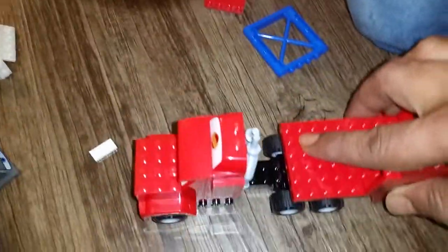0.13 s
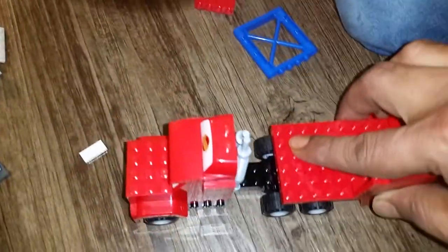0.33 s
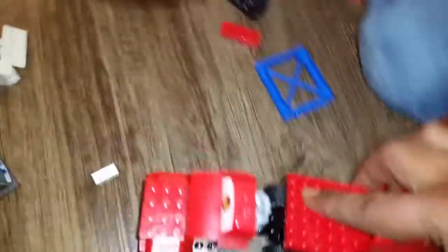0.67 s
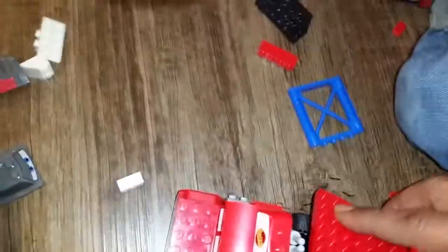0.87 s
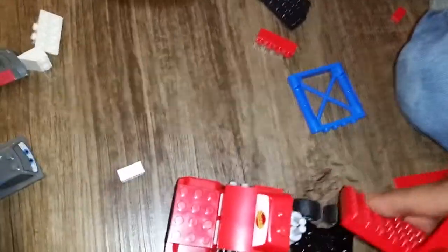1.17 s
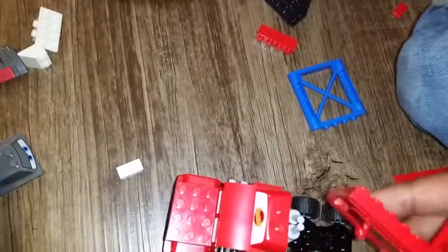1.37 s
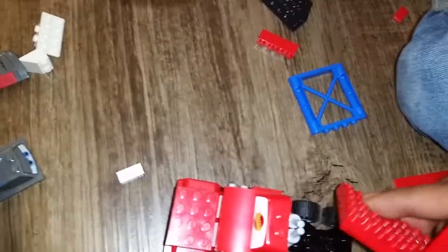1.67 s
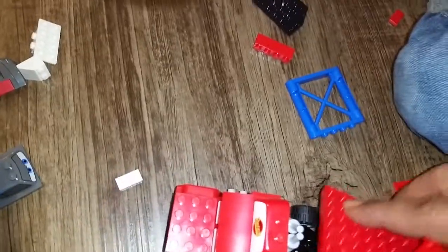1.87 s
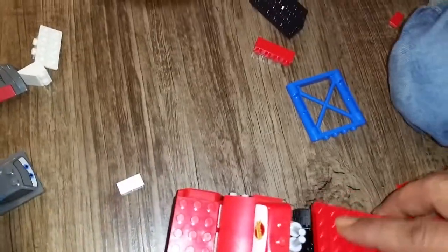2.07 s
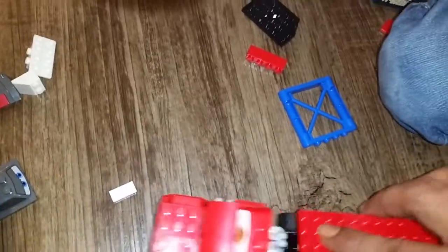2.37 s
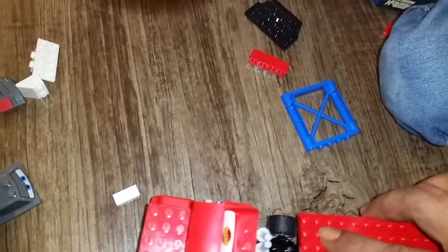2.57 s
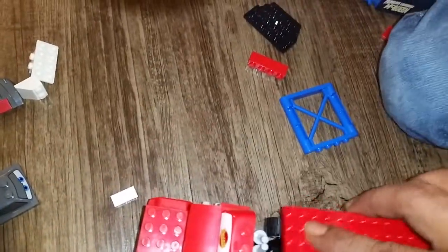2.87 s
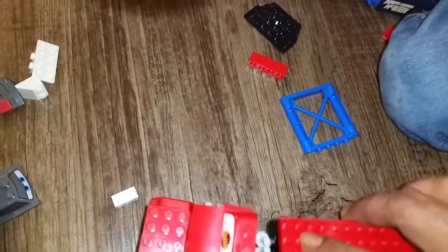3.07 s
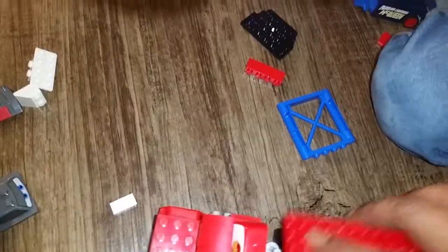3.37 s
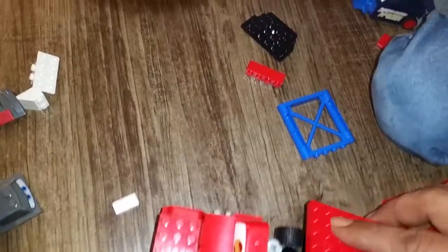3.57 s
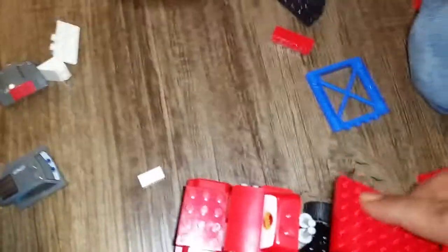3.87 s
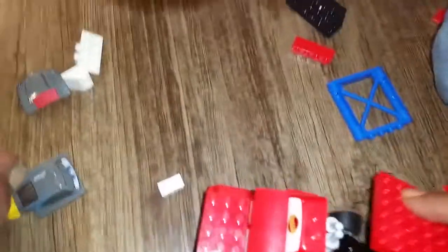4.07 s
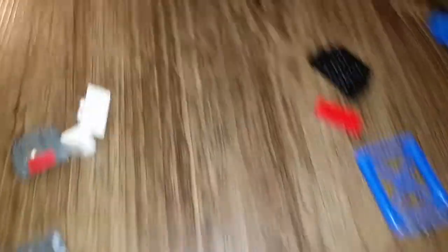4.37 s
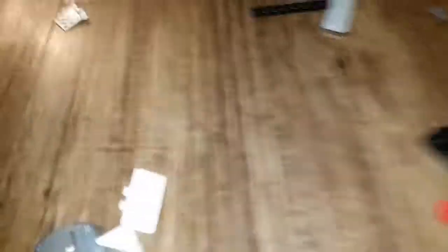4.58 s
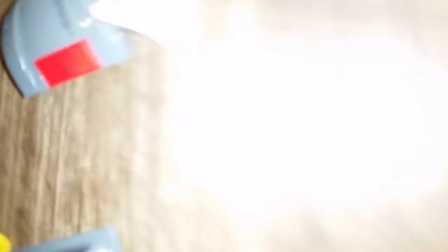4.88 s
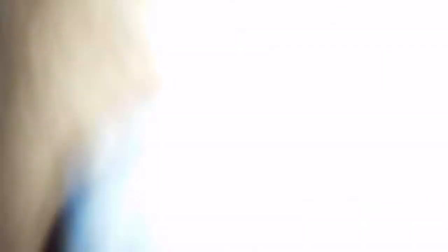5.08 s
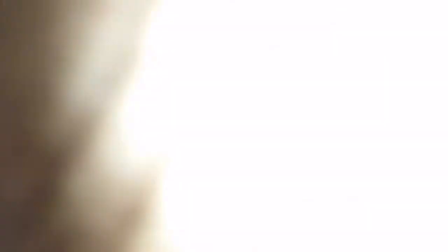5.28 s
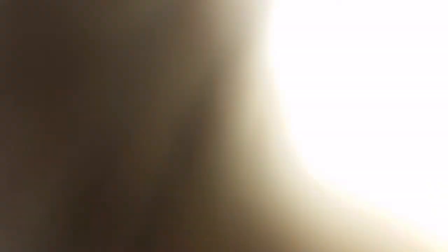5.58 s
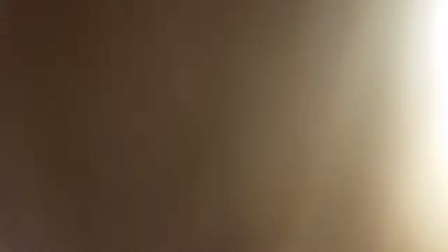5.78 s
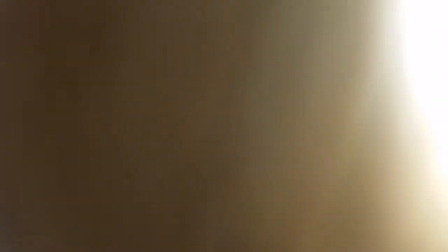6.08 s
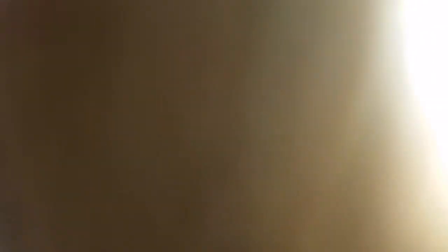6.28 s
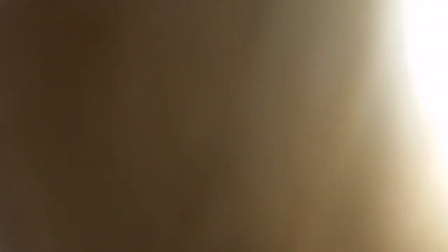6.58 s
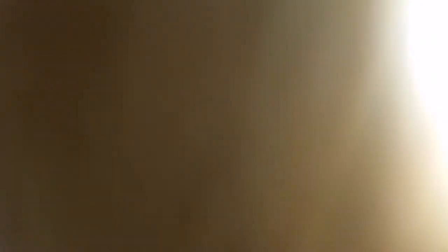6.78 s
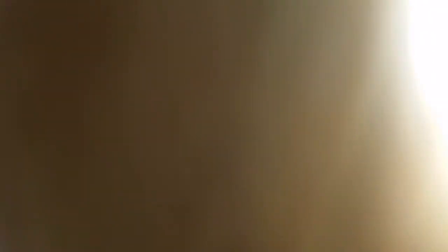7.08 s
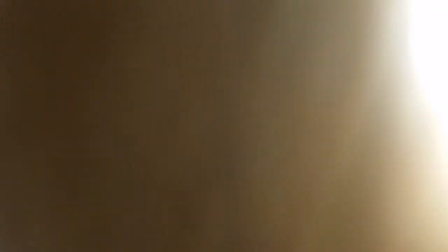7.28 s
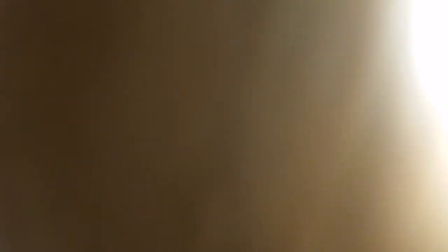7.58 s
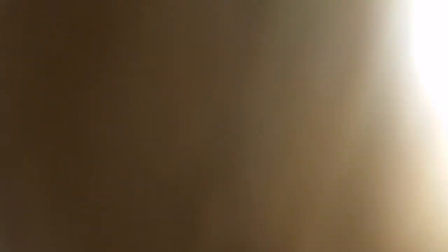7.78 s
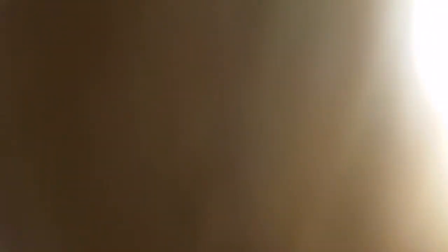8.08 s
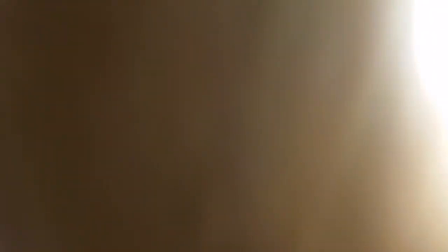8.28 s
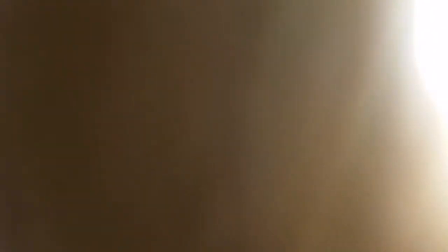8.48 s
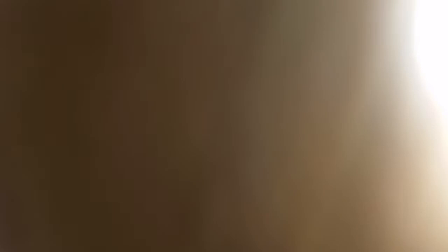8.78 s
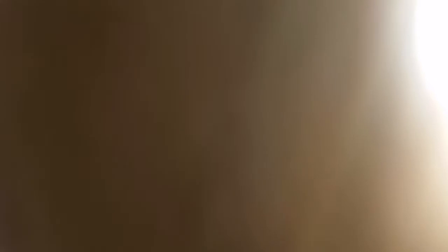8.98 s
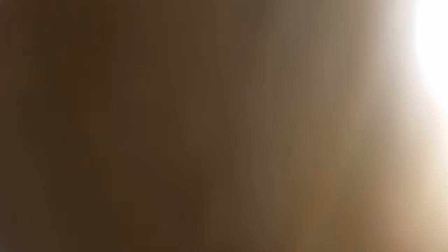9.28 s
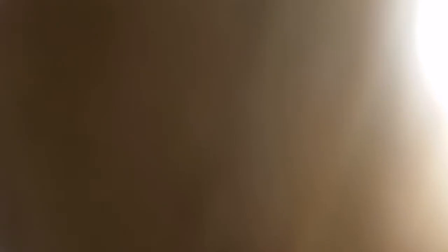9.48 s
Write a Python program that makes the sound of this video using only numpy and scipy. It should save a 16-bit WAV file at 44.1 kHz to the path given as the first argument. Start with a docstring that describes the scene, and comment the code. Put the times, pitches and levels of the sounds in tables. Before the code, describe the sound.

Hands handle a plastic toy truck close by on a wooden floor in a small room, over faint rustling, low hum and hiss. Scattered dull clacks and short scrapes fill the first four seconds, with a quick cluster of sharp, ringing snaps from 2.6 to 3 seconds as bricks lock in. Two bright clicks come around 5 seconds. At 5.2 the microphone is set down with a very loud, slightly overloaded thump and quick bounces; more low bumps, case knocks and rumble follow, mostly left, until 5.9. The background sinks until about 7 seconds, leaving a faint drag near 6.1 and light ticks on the right from 6.5 to 6.8. From 7 to 7.7 loose bricks rattle brightly, close on the right, with soft scraping. A clack follows, then a click at 8.6 and a dull knock at 8.8 amid soft rustling.

```python
"""Dull clacks, scrapes and a few ringing snaps: plastic bricks are pressed onto a toy truck on a
wooden floor, each blow ringing the modes of a part. The phone is put down with loud thumps and
bounces, the background sinks for a while, then loose bricks rattle close on the right.
Hands rustle throughout, over a low hum and the hiss of a small room."""
import sys
import numpy as np
from scipy import signal
from scipy.fft import rfft, irfft
from scipy.io import wavfile

SR = 44100
rng = np.random.default_rng(int(sys.argv[2]) if len(sys.argv) > 2 else 0)


def output_pcm(signal):
    """Save a mono or channel-first signal as 16-bit PCM at the path in sys.argv[1].

    Samples are clipped to [-1, 1] before scaling.
    """
    pcm = np.clip(np.atleast_2d(signal).T, -1, 1) * 32767
    wavfile.write(sys.argv[1], SR, np.round(pcm).astype(np.int16))


N = 425124
TIME = np.arange(N) / SR
TOP_HZ = 14800
# the phone lands on its right end, tips onto its left microphone and is let go
LANDING_S, TIP_S, LET_GO_S = 5.2075, 5.436, 5.94
# pan is left minus right; the phone ends up turned, which moves the bricks to the right
LANDED_PAN_DB, TIPPED_PAN_DB, TURN_DB = -2.5, 14.5, -8


def undb(db):
    """Decibels to gain."""
    return 10 ** (np.asarray(db) / 20)


def unit(x):
    """Scale to rms 1."""
    return x / np.sqrt(np.mean(x ** 2))


def ears(pan_db):
    """Left and right gains whose mean is 1."""
    gains = undb(np.array([[pan_db], [-pan_db]]) / 2)
    return gains / gains.mean()


def add(track, s, sound):
    """Mix a sound in at a time."""
    start = max(int(s * SR), 0)
    track[:, start:start + sound.shape[1]] += sound[:, :N - start]


def noise(size, likeness):
    """Stereo white noise; likeness is the correlation of the sides."""
    mid, side = rng.standard_normal((2, size))
    spread = np.sqrt(1 - likeness) * side * np.array([[1], [-1]])
    return (np.sqrt(1 + likeness) * mid + spread) / np.sqrt(2)


def walk(rate, size):
    """A random wobble with a spread near 1 and rate turns a second."""
    knots = np.arange(size) * rate / SR
    count = int(knots[-1]) + 2
    return np.interp(knots, np.arange(count), rng.standard_normal(count))


def fading(t, t60):
    """A decay of 60 dB in t60 seconds."""
    return np.exp(-np.log(1000) * t / t60)


def colour(x, points):
    """Equalise along a curve of (f/Hz, level/dB) points."""
    hz, db = np.transpose(points)
    bins = np.arange(x.shape[-1] // 2 + 1) * SR / x.shape[-1]
    return irfft(rfft(x) * undb(np.interp(np.log(bins + 1), np.log(hz), db)), x.shape[-1])


def resonate(x, hz, width_hz):
    """One resonance, gain 1 at its centre."""
    hz = min(hz, SR / 2 - 1000)
    return signal.lfilter(*signal.iirpeak(hz, hz / min(width_hz, SR / 4), fs=SR), x)


def lowpass(x, hz, order):
    """Roll off the top."""
    return signal.sosfilt(signal.butter(order, min(hz, SR / 2 - 1000), fs=SR, output="sos"), x)


def room(x, wet_db, t60=0.52, early_t60=0.1, early_db=3, cross=0.69):
    """Quick reflections from floor and furniture, then the tail of a small room."""
    t = np.arange(SR // 2) / SR
    decay = fading(t, t60) + undb(early_db) * fading(t, early_t60)
    response = noise(len(t), 0.064) * decay * (1 - np.exp(-t / 0.0025))
    response /= np.sqrt(np.sum(response ** 2, axis=1, keepdims=True))
    return x + undb(wet_db) * signal.fftconvolve(x + cross * x[::-1], response, axes=1)[:, :N]


def from_right(x, lag_s=0.0004):
    """Sound from the right reaches the left microphone a little later."""
    return np.array([np.roll(x[0], int(lag_s * SR)), x[1]])


def placed(rows, pan_db):
    """Pan blows to where their part lies, further right once the phone has turned."""
    return [(s, db, hz, pan_db + TURN_DB * (s > LANDING_S)) for s, db, hz in rows]


def on_case(rows):
    """Pan knocks to the side of the phone that touches down."""
    return [(s, db, hz, TIPPED_PAN_DB if TIP_S < s < LET_GO_S else LANDED_PAN_DB) for s, db, hz in rows]


def strikes(rows, modes, focus_db, crack_db, contact_s, touch, top_hz, detune, bounce, likeness,
            gain_db):
    """Each blow is a hard touch, a short chatter and a rebound that ring the modes of a plastic part."""
    out, t = np.zeros((2, N)), np.arange(SR // 8) / SR
    # a small part radiates little below its lowest mode
    low_cut = signal.butter(3, 0.56 * modes[0][0], "highpass", fs=SR, output="sos")
    for s, db, strong_hz, pan_db in rows:
        force = noise(len(t), likeness) * np.exp(-(t / contact_s) ** 2)
        force[:, 0] += touch
        force += bounce * np.roll(force, int(rng.uniform(.002, 0.0068) * SR), axis=1)
        # a softer contact carries less treble
        force = signal.sosfilt(low_cut, lowpass(force, max(top_hz, 0.9 * strong_hz), order=3))
        sound = undb(crack_db) * resonate(force, strong_hz, 2.3 * strong_hz)
        for hz, width_hz, mode_db in modes:
            # the spot struck favours modes near strong_hz; the others shift with piece and grip
            nearness = np.exp(-(np.log2(hz / strong_hz) / 0.25) ** 2)
            shift = 1 + detune * (1 - nearness) * rng.standard_normal()
            sound += undb(mode_db + focus_db * nearness) * resonate(force, hz * shift, width_hz)
        crest = 3 * sound[:, :SR // 100].std(axis=1, keepdims=True)
        add(out, s, sound / crest * undb(db + gain_db) * ears(pan_db))
    return out


def sinking(low_db=-14.5, sink_s=0.14, return_s=7.035, rise_s=0.078, after_db=2):
    """Background gain in dB: it ducks at the landing, holds and comes back a little louder."""
    sunk = 1 - np.exp(-np.maximum(TIME - LANDING_S, 0) / sink_s)
    back = (1 + np.tanh((TIME - return_s) / rise_s / 2)) / 2
    return low_db * sunk * (1 - back) + after_db * back


def muffle(x, top_hz=9000, held_db=3.5, lying_db=-2):
    """Mids and top hiss duck further than the rest; the top stays duller once the phone lies."""
    scoop = 1 - undb(0.33 * np.minimum(sinking(), 0))
    x = x - resonate(x, hz=1250, width_hz=1300) * scoop
    dull = signal.sosfiltfilt(signal.butter(8, top_hz, fs=SR, output="sos"), x)
    return dull + (x - dull) * undb(sinking() + np.where(TIME < LANDING_S, held_db, lying_db))


def room_tone(air_db=-45, hum_gain_db=-1, waver_db=2.5, split_hz=900, hiss_db=-3):
    """A wavering hum over low room noise, alike on both sides, and a wide hiss."""
    # tones of the hum: f/Hz, level/dB
    tones = [(120.5,-55), (165,-50), (651,-62)]
    # EQ of the room noise: f/Hz, level/dB
    air_eq = [(15, -42.5), (25, -15.5), (71, -8), (106, -1.5), (167, -11), (191, -0.5), (415, -11.5),
              (637, -11), (729, -13.5), (1060, -15), (1720, -18.5), (3540, -13), (8100, -29.5),
              (13800, -22.5), (15000, -37)]
    wide = noise(N, 0.023)
    hiss = wide - lowpass(wide, split_hz, order=1)
    air = lowpass(noise(N, 0.78), split_hz, order=1) + undb(hiss_db) * hiss
    hum = 0
    for hz, db in tones:
        amplitude = np.sqrt(2) * undb(db + hum_gain_db + waver_db * walk(6, N))
        hum += amplitude * np.sin(2 * np.pi * hz * TIME + .5 * walk(9, N))
    return (unit(colour(air, air_eq)) * undb(air_db) + hum) * undb(sinking()) * ears(-0.91)


def rustle(resting_db=-44.5, gain_db=-3.5, flicker_db=1.5, pan_db=-7.5):
    """Skin and sleeves brush along with a fine flicker; each stroke swells and fades."""
    # hand strokes: middle t/s, length/s, level/dB
    strokes = [(0.27,1.04,-43.5), (1.31,0.48,-40.5), (1.675,0.5,-37), (2.398,2.8,-42.5), (3.563,1.25,-41.5),
               (4.165,0.5,-39), (5.077,0.3,-36.5), (7.608,1.95,-41.5), (8.25,0.16,-40), (8.725,0.52,-38.5),
               (9.38,0.2,-40)]
    # EQ of skin and cloth: f/Hz, level/dB
    cloth_eq = [(710, -37), (1200, -11), (1670, -10), (2510, -2), (4090, -3.5), (7310, -2), (8300, -3),
                (10100, -16.5), (13900, -16.5), (15000, -37.5)]
    power = undb(resting_db) ** 2
    for s, length, db in strokes:
        swell = np.cos(np.pi * np.clip((TIME - s) / length, -.5, .5))
        power = power + (undb(db) * swell) ** 2
    level_db = 10 * np.log10(power) + sinking() + flicker_db * walk(60, N)
    return unit(colour(noise(N, 0.13), cloth_eq)) * undb(level_db + gain_db) * ears(pan_db)


def grip_rumble(db=-34, rise_db_per_s=21, fall_db_per_s=170, jolt_db=3, pan_db=12):
    """The grip slides on the phone and tightens; its rumble dies as the hand lets go."""
    rub = resonate(noise(N, .4), hz=110, width_hz=260)
    rumble = unit(lowpass(resonate(rub, hz=110, width_hz=260), 190, order=2))
    grip_db = db - np.maximum(rise_db_per_s * (LET_GO_S - TIME), fall_db_per_s * (TIME - LET_GO_S))
    return rumble * undb(grip_db + jolt_db * walk(23, N)) * ears(pan_db)


def case_taps():
    """The phone's case knocks dully as it settles."""
    # knocks: t/s, level/dB, strongest f/Hz
    hits = [(5.2073,-4,1110), (5.2112,-5.5,800), (5.3615,-14,3100), (5.6595,-27,950), (5.4445,-11.5,704),
            (5.6695,-7,812), (5.6725,-12.5,1150), (5.6915,-20,1500), (5.7045,-17.5,900),
            (5.7152,-14.5,3100), (5.7228,-17.5,1800), (5.7335,-12,1750), (5.741,-14,1650), (5.745,-14,800),
            (5.8105,-19.5,1000), (5.845,-23.5,800), (5.882,-16,1700), (5.8875,-17,910)]
    # case modes: f/Hz, width/Hz, level/dB
    modes = [(560,150,10.5), (810,300,7), (1250,350,4.5), (1750,400,-4.5), (2330,300,-5.5), (3150,400,-6)]
    return strikes(on_case(hits), modes, focus_db=15.5, crack_db=-19.5, contact_s=0.0018, touch=3.6,
                   top_hz=3120, detune=0.088, bounce=0.14, likeness=0.15, gain_db=-4)


def corner_pings():
    """A hard corner strikes plastic and pings."""
    # pings: t/s, level/dB, strongest f/Hz
    hits = [(5.2073,-10.5,6660), (5.3355,-23.5,7600), (5.67,-19.5,5870), (5.7232,-27.5,7540),
            (5.7635,-13.5,2580), (5.785,-24,6200), (5.789,-27,3800), (5.845,-22,4400)]
    # modes the corner rings: f/Hz, width/Hz, level/dB
    modes = [(2550,30,4.5), (3774,36,0.5), (4400,120,-9), (5890,73,2), (6500,130,-6), (7520,90,1),
             (9800,97,-10)]
    return strikes(on_case(hits), modes, focus_db=9.5, crack_db=-13, contact_s=0.0016, touch=6.1,
                   top_hz=11300, detune=0, bounce=0.14, likeness=0.23, gain_db=-7)


def bounces(push_hz=265, ring_hz=184, ring_db=-1.5, rise_s=0.00079, scuff_db=-27, scuff_hz=1300):
    """The phone bounces on its edge: each soft push leaves a few cycles of low ring."""
    # bounces: t/s, level/dB
    hits = [(5.224,-6.5), (5.2402,-5.5), (5.2576,-3.5), (5.282,-6), (5.295,-9)]
    out, t = np.zeros((2, N)), np.arange(-SR // 100, SR // 6) / SR
    spread = (np.pi * push_hz * t) ** 2
    push = (1 - 2 * spread) * np.exp(-spread)
    attack = (1 + np.tanh(t / rise_s)) / 2
    ring = np.cos(2 * np.pi * ring_hz * t) * fading(np.maximum(t, 0), t60=0.048) * attack
    for s, db in hits:
        scuff = np.exp(-spread) * unit(lowpass(noise(len(t), .5), scuff_hz, order=3))
        sound = push + undb(ring_db) * ring + undb(scuff_db) * scuff
        add(out, s + t[0], sound / np.abs(sound).max() * undb(db) * ears(LANDED_PAN_DB))
    return out


def thumps(stiffen=2.6, relax_s=0.0014, body_hz=262, heave_hz=58, rub_hz=850, rise_s=0.0008):
    """A bump rocks the phone, fastest while the contact is hard; its weight heaves, its body rings."""
    # bumps through hand and floor: t/s, level/dB, f/Hz, t60/s, pan/dB
    bumps = [(4.416,-32,57,.05,-2), (4.648,-24.5,99,0.045,-1.5), (5.2078,10,132,.022,-1),
             (5.3627,-5,129,.055,-3.5), (5.4293,-9,149,0.067,-6), (5.4446,-9,165,.08,6),
             (5.557,-23,190,0.09,9), (5.7153,-4.5,114,0.079,15), (5.7307,0,151,.05,15),
             (5.7431,-4.5,205,.035,14), (5.8107,-4,119,0.036,15), (5.8159,-4,135,.05,17),
             (5.8299,-5.5,99,.06,20), (5.8665,-14,101,0.094,15), (5.874,-9,94,0.082,18),
             (5.8876,-10,230,0.053,8), (5.9215,-16,95,.08,18), (8.752,-23.5,301,0.043,-1.5)]
    out, t = np.zeros((2, N)), np.arange(SR // 3) / SR
    mic_phase = np.array([[0], [0.9]])
    heave = fading(t, t60=0.07) * np.sin(2 * np.pi * heave_hz * t)
    for s, db, hz, t60, pan_db in bumps:
        cycles = hz * (t + stiffen * relax_s * (1 - np.exp(-t / relax_s)))
        rock = fading(t, t60) * np.sin(2 * np.pi * cycles + mic_phase)
        shift = 1 + 0.063 * rng.standard_normal((2, 1))
        body = fading(t, t60=0.22) * np.sin(2 * np.pi * body_hz * shift * t)
        rub = fading(t, t60) * unit(lowpass(noise(len(t), .3), rub_hz, order=3))
        sound = (rock + undb(-18) * (heave + body) + undb(-19) * rub) * (1 - np.exp(-t / rise_s))
        sides = ears(pan_db)
        add(out, s, -sound / np.abs(sound).max() * undb(db) * sides / sides.max())
    return signal.sosfilt(signal.butter(1, 25, "highpass", fs=SR, output="sos"), out)


def drag(middle_s=6.075, rise_s=0.046, fall_s=0.075, db=-46, grain_db=6, slips_per_s=160, pan_db=-1):
    """A hollow part is dragged over the floor: a swell of fine slips that ring its walls."""
    # wall modes: f/Hz, width/Hz, level/dB
    modes = [(1220,130,-12), (1870,150,-5), (2265,45,-1), (2450,400,-1), (2770,160,-4), (3200,140,-9),
             (5160,900,-16), (7550,140,-11)]
    swell = np.exp(-((TIME - middle_s) / np.where(TIME < middle_s, rise_s, fall_s)) ** 2)
    slips = lowpass(noise(N, 0.95), 9000, order=8) * undb(grain_db * walk(slips_per_s, N))
    walls = sum(undb(mode_db) * resonate(slips, hz, width_hz) for hz, width_hz, mode_db in modes)
    return unit(walls) * swell * undb(db) * ears(pan_db)


def scrapes(truck_hz=2090, grain_db=4.5, slips_per_s=600):
    """Plastic edges slide on plastic and floor, catching and slipping in uneven grains."""
    # slides: start t/s, length/s, level/dB, centre f/Hz
    slides = [(0.841,0.04,-43.5,2250), (1.125,0.32,-48,2880), (1.53,0.24,-47,700), (2.166,0.027,-33,2000),
              (2.197,0.09,-38.5,8400), (2.471,0.036,-35,2420), (2.611,0.039,-32.5,1710),
              (3.036,0.026,-35,1910), (3.182,0.026,-29,2000), (3.21,0.059,-32.5,2370),
              (3.362,0.032,-41,1900), (3.478,0.05,-41,1280), (7.159,0.61,-46.5,2500), (7.179,0.61,-50,1690),
              (7.90,0.11,-43,3200)]
    out = np.zeros((2, N))
    for s, length, db, hz in slides:
        width_hz = 1560 * np.sqrt(hz / truck_hz)
        # scrapes near the truck's own pitch sit left, the others right
        pan_db = 10 - 9.5 * abs(np.log2(hz / truck_hz)) + TURN_DB * (s > LET_GO_S)
        size = int(max(length, .01) * SR)
        slips = noise(size, 0.3) * undb(grain_db * walk(slips_per_s, size))
        slips *= signal.windows.tukey(size, .4)
        for _ in range(3):
            slips = resonate(slips, hz, width_hz)
        add(out, s, unit(slips) * undb(db) * ears(pan_db))
    return out


def small_brick_ticks(strong_hz=5420, pan_db=-14):
    """One small brick ticks lightly on the right."""
    # ticks: t/s, level/dB
    hits = [(6.5487,-39), (6.5982,-32), (6.623,-30.5), (6.636,-34), (6.665,-37.5), (6.6735,-35),
            (6.7056,-28.5), (6.7464,-32), (6.767,-31.5), (6.792,-37)]
    # small brick modes: f/Hz, width/Hz, level/dB
    modes = [(3960,790,-14), (5400,120,2), (7820,160,0), (10100,110,-9)]
    rows = placed([(s, db, strong_hz) for s, db in hits], pan_db)
    return strikes(rows, modes, focus_db=14, crack_db=-31, contact_s=0.0025, touch=1.5,
                   top_hz=8300, detune=0, bounce=0, likeness=.3, gain_db=-4)


def pile(from_s=7.17, to_s=7.68, per_s=55, hz=5600, octaves=0.51):
    """Small random clicks as fingers stir the pile: t/s, level/dB, strongest f/Hz."""
    times = np.arange(from_s, to_s, 1 / per_s)
    chance = rng.standard_normal((len(times), 3))
    return [(s + .5 * late / per_s, -28.5 + 3 * hard, min(hz * 2 ** (octaves * high), TOP_HZ))
            for s, (late, hard, high) in zip(times, chance)]


def brick_clicks(pan_db=-10):
    """Loose bricks click together and rebound in a bright rattle."""
    # the louder clicks: t/s, level/dB, strongest f/Hz
    hits = [(3.4735,-24,4020), (3.497,-24,4030), (4.9736,-22,7250), (5.0579,-15,8620), (7.0455,-21.5,6250),
            (7.0918,-24,6250), (7.1854,-19.5,5430), (7.1949,-15,7960), (7.2379,-16.5,8000),
            (7.2883,-17,7800), (7.3128,-18.5,6860), (7.3195,-26,2000), (7.3487,-25,4230), (7.376,-21,5430),
            (7.4128,-27,4260), (7.4195,-10.5,7270), (7.4255,-14.5,7900), (7.4655,-16,4780),
            (7.4792,-13,4900), (7.5137,-13,7200), (7.5391,-17.5,7810), (7.581,-23,2180), (7.592,-19.5,3720),
            (7.6494,-21.5,6140), (8.5999,-22,9300)]
    # loose brick modes: f/Hz, width/Hz, level/dB
    modes = [(1740,45,-2), (2240,130,-9), (3757,82,-5), (4660,100,-2), (5450,150,-6), (6270,180,-1),
             (7660,130,-4), (7930,100,0), (12830,810,1)]
    return strikes(placed(hits + pile(), pan_db), modes, focus_db=12.5, crack_db=-8.5, contact_s=0.0023,
                   touch=3.6, top_hz=9300, detune=0.045, bounce=0.6, likeness=.3, gain_db=-1)


def stud_snaps(pan_db=-3):
    """Studs snap home with a hard attack that rings the plate."""
    # snaps: t/s, level/dB, strongest f/Hz
    hits = [(2.559,-23.5,4600), (2.7095,-18,4700), (2.7688,-16,2480), (2.8382,-7,4630), (2.8601,-11,5650),
            (2.871,-11,6780), (2.9388,-14.5,7200), (2.9455,-25,9400), (2.984,-29,8300)]
    # plate modes: f/Hz, width/Hz, level/dB
    modes = [(2250,42,4.5), (4705,88,0), (5250,42,1), (6730,120,-4.5), (6810,100,-4.5), (8240,100,-1.5),
             (9380,97,-7), (13500,690,-6.5)]
    return strikes(placed(hits, pan_db), modes, focus_db=14.5, crack_db=-21, contact_s=0.0014, touch=9,
                   top_hz=13000, detune=0.005, bounce=0.2, likeness=0.082, gain_db=-0.5)


def truck_clacks():
    """The truck knocks under the fingers: soft contacts on broad, damped modes."""
    # clacks: t/s, level/dB, strongest f/Hz, pan/dB
    hits = [(0.244,-32.5,1340,1), (0.762,-17,1500,5), (1.063,-33,1060,5), (2.155,-12.5,2100,4),
            (2.175,-18.5,1490,-8), (2.454,-27.5,1230,3), (2.554,-19.5,2130,2.5), (2.631,-22.5,1120,-2.5),
            (2.651,-21,2240,10), (2.768,-25.5,1760,0), (2.981,-26.5,2280,6), (3.056,-22,2460,1),
            (3.083,-31,1450,-3), (3.205,-14.5,2250,7), (3.417,-23.5,1590,4), (3.682,-12.5,1610,2),
            (3.979,-21,1610,3), (7.757,-25.5,2080,-4), (8.751,-16.5,1330,-5), (8.839,-28.5,1220,-3)]
    # truck modes: f/Hz, width/Hz, level/dB
    modes = [(716,180,-11.5), (1160,110,6), (1558,420,-1), (2060,240,-2), (2254,220,-1), (2860,180,-2.5),
             (3960,200,2.5), (5570,360,4)]
    return strikes(hits, modes, focus_db=9, crack_db=-13, contact_s=0.0037, touch=2.1,
                   top_hz=3060, detune=0.045, bounce=0.22, likeness=0.48, gain_db=1.5)


def scene(truck_t60=0.27):
    """A close, dry truck, bricks out in the room, bumps right at the microphone, and the background."""
    clacks, snaps = truck_clacks(), stud_snaps()
    rattle = from_right(brick_clicks() + small_brick_ticks())
    knocks = case_taps() + corner_pings()
    bricks = room(clacks, wet_db=-8.5, t60=truck_t60) + room(snaps, wet_db=-7) + room(rattle, wet_db=-10)
    slides = room(scrapes(), wet_db=-9, t60=truck_t60) + room(drag(), wet_db=-2, t60=0.4, early_db=12)
    phone = room(knocks, wet_db=-20.5) + thumps() + bounces() + grip_rumble()
    background = muffle(from_right(rustle()) + room_tone())
    return background + phone + slides + bricks


def record(dry):
    """The loudest bumps overload the microphone; the top is cut steeply."""
    top_cut = signal.ellip(8, .2, 70, TOP_HZ, fs=SR, output="sos")
    return signal.sosfilt(top_cut, np.clip(dry, -.94, .94))


dry = scene()
out = record(dry)
output_pcm(out)
```